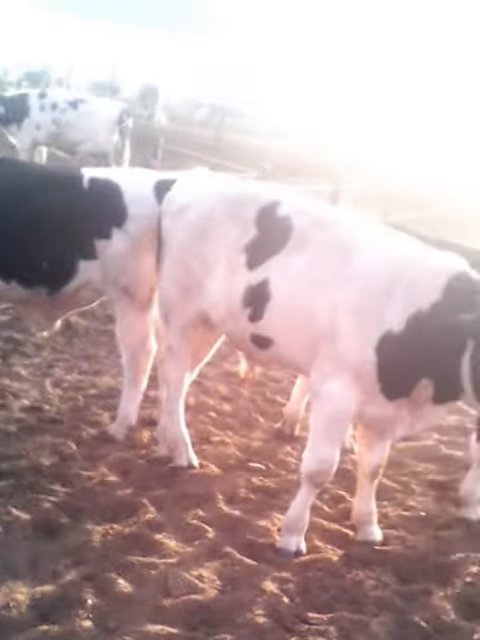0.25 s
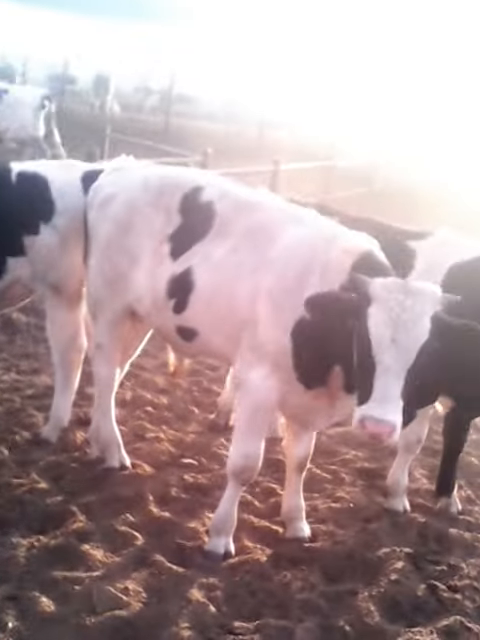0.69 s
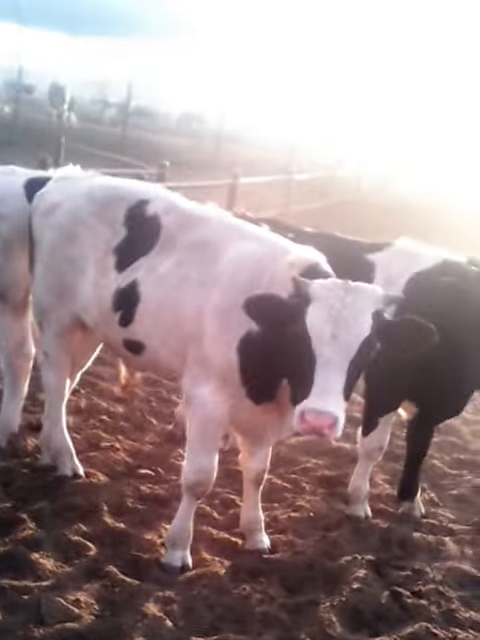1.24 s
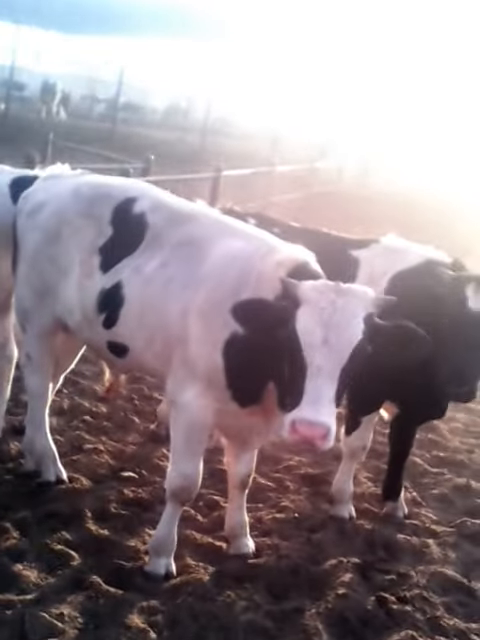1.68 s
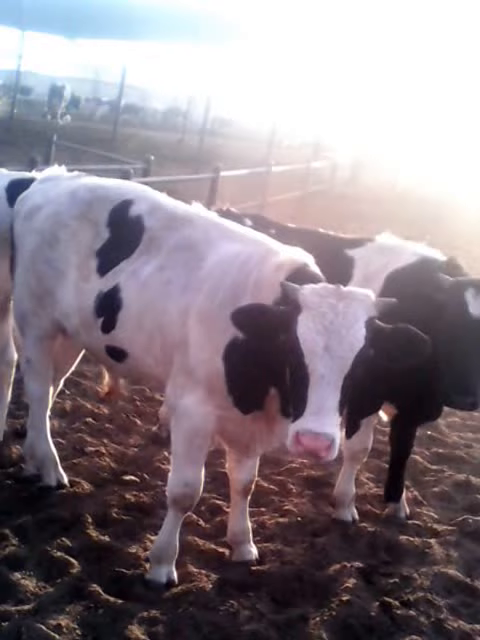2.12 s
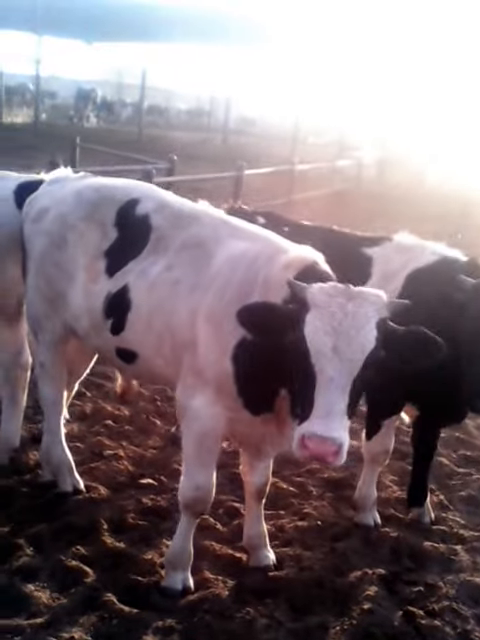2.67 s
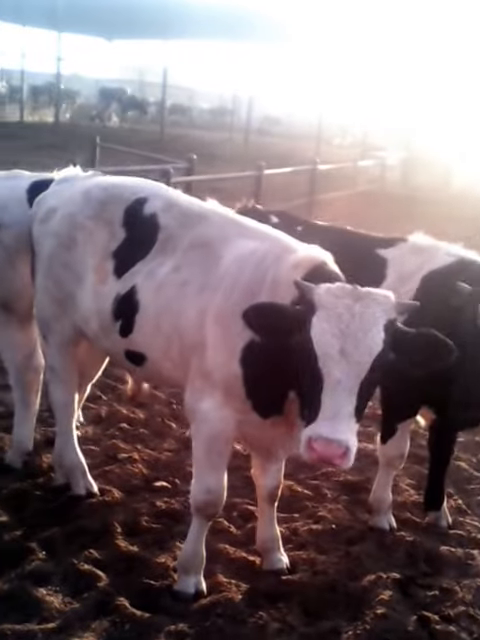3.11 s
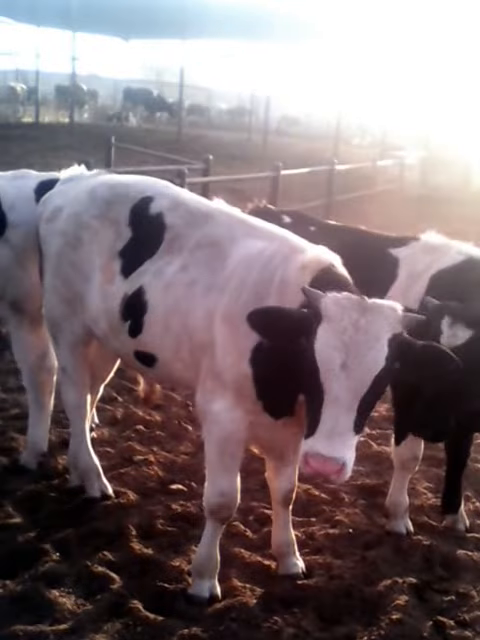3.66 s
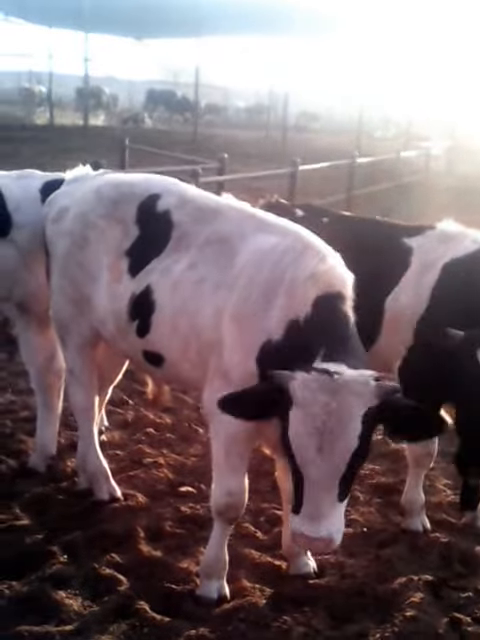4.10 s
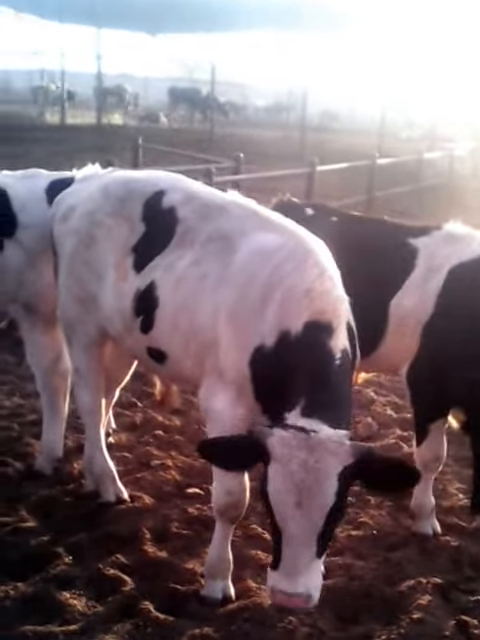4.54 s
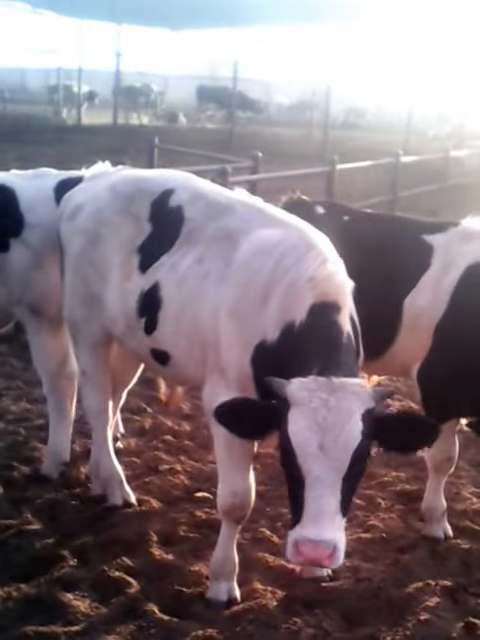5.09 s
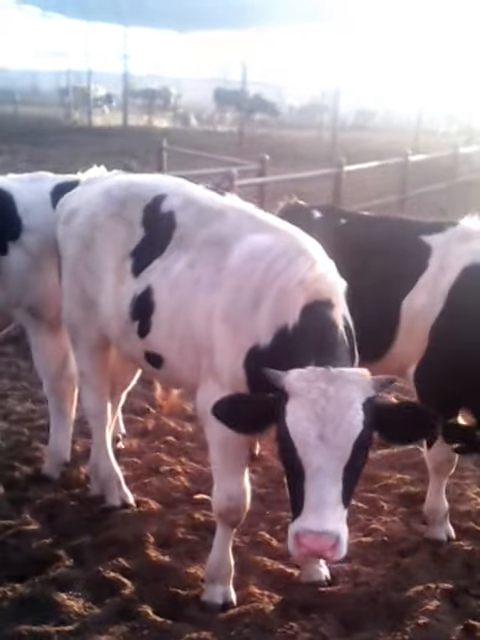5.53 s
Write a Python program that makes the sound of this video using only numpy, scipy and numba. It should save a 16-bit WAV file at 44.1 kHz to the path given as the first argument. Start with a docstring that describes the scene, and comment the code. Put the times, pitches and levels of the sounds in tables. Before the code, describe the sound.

A young bull moos five times in an open dirt pen, each call creaking into a clear rising tone, then cracking off abruptly.

```python
"""A young bull moos five times across a pen; the first call is already under way.
Calls 2-5 start as a low creak and lock into a clean rising tone; all five break into creak again.
Fold harmonics, chopped by slower flapping when slack, ring the throat; the fundamental hums through the nose.
Far sheds add a faint delayed echo, noise makes the farm's murmur and hiss, sines the phone's whine."""
import sys
import numpy as np
from scipy import signal
from scipy.fft import rfft, irfft, next_fast_len
from scipy.io import wavfile
from scipy.ndimage import uniform_filter1d
from numba import njit

SR = 44100
rng = np.random.default_rng(int(sys.argv[2]) if len(sys.argv) > 2 else 0)


def generate_wav(signal):
    """Clip the signal to [-1, 1] and save it as 16-bit WAV at the path in sys.argv[1]."""
    frames = np.transpose(np.atleast_2d(signal))
    scaled = np.clip(frames, -1, 1) * 32767
    pcm = np.round(scaled).astype(np.int16)
    wavfile.write(sys.argv[1], SR, pcm)


N = 256220
LEAD = 30000  # samples computed ahead of the output

# One curve per call: t/s, pitch f/Hz, main throat resonance level/dB
CALL_CURVES = [
    [(-.6, 194.3, -36.5), (0.0, 195, -38), (0.128, 191.1, -38.5), (0.16, 184.9, -42.5), (0.2, 163, -55.5),
     (0.25, 140, -65)],
    [(0.82, 121.6, -77), (0.918, 137.6, -68), (1.02, 146.7, -59.5), (1.08, 167.4, -61),
     (1.166, 174.5, -55.5), (1.316, 185.1, -46.5), (1.498, 193.1, -40), (1.604, 194.6, -38.5),
     (1.696, 191, -40), (1.74, 181.3, -46.5), (1.765, 168.6, -61), (1.81, 147.8, -69)],
    [(2.32, 121.6, -86), (2.398, 129.1, -70.5), (2.478, 153.4, -59.5), (2.53, 167.6, -61),
     (2.656, 181.4, -53), (2.834, 190.7, -42), (2.892, 193.8, -40.5), (3.062, 192.4, -42),
     (3.098, 180, -47), (3.126, 163.3, -57.5), (3.18, 147, -76)],
    [(3.61, 129.9, -87), (3.66, 143.4, -70), (3.738, 156.8, -60), (3.81, 167.2, -57), (3.96, 182.9, -45.5),
     (4.074, 189.9, -40), (4.218, 193.1, -38.5), (4.318, 192.1, -38.5), (4.354, 182.7, -44),
     (4.392, 161.4, -57), (4.44, 153.2, -75)],
    [(4.82, 131, -84), (4.892, 149.4, -61.5), (4.96, 167.3, -55), (5.07, 180.4, -47.5),
     (5.14, 185.2, -42.5), (5.338, 195, -35), (5.4, 200, -39), (5.484, 205.5, -41), (5.516, 175.3, -45),
     (5.545, 169, -59.5), (5.59, 150.4, -67)],
]
# Fold state, row per call: tone locks t/s, tone breaks t/s, break to shut mouth t/s,
# flap rate before and after f/Hz, slackness before and after [0-1]
CALL_STAGES = [(-.5, .135, .07, 102.2, 115.5, .8, 0.85), (1.101, 1.701, .065, 109.1, 113.1, 0.9, 0.73),
               (2.54, 3.065, .062, 103, 107, .78, 0.79), (3.819, 4.319, .072, 100, 110, .9, 0.75),
               (4.95, 5.47, 0.067, 104, 89.87, .66, 0.43)]
# Colour, row per call: hum at lock, hum at break, treble at lock, treble at break,
# lowest group at lock, lowest group at break, middle group, highest group; all level/dB
CALL_COLOURS = [(-51, -52.5, 2, 0.5, -3, -1.5, 0, 4.5), (-58, -55.5, -0.5, 0.5, -1.5, 1, 1, 0),
                (-58, -59, -4.5, -2.5, 1, 0, -1, -7), (-58.5, -55.5, -1, -0.5, 0.5, 0, -0.5, 2),
                (-58, -54, -2, -1.5, 0.5, 0, -0.5, 0.5)]
# Throat resonances by group, low to high: f shut/Hz, f open/Hz, width/Hz,
# level shut/dB, level open/dB (relative within the group)
THROAT_MODES = [
    [(340, 220, 71, -6, 1.5), (645, 641.7, 47.3, 7.5, 13.5)],
    [(989, 989.3, 50.8, -1.5, -4)],
    [(1410, 1100, 110, -9.5, -9), (1644, 1550, 73, 26, 33.5)],
    [(2070, 2210, 410, -1.5, -1), (2280, 2414, 194, 4.5, 2.5), (2940, 2850, 390, -11, -8)],
    [(3560, 3436, 300, 12.5, 22.5), (4500, 1400, 140, -2, -14.5)],
]
# Throat group: level open/dB, slope [dB per dB of main resonance], share of treble [1],
# narrow ring f/Hz, swell when an overtone lands on it level/dB
THROAT_GROUPS = [(-47.5, 0.6968, 0.059, 602, 0), (-43.5, 1, 0.073, 1000, 0), (-63.5, 0.45, 0.82, 1665, 6),
                 (-62, 0.53, .9, 2510, 2), (-72, .5, 0.85, 3500, 1.5)]
# Breath noise gain per throat group, ahead of AIR_GAIN: level/dB
BREATH_GAIN_DB = [-39, -38, -24, -20, -15]
# Hum re held level: at start, creaking, after break, mouth shutting, after it; level/dB
HUM_STAGE_DB = [-23.5, -8.5, -3.5, 1.5, -19.5]
# Sum tone re lowest group: before lock, after break, mouth shutting, after it; level/dB
SUM_STAGE_DB = [-1.5, -7.5, 7.5, -4]
# Treble change: at start, just after break, mouth shut; level/dB
TREBLE_STAGE_DB = [-5, 1, -5.5]
# Momentary cracks in the held tone: t/s, slackness [0-1]
TONE_CRACKS = [(1.49, .097), (4.06, .093)]
# Hard fold closure every third cycle: t/s, depth level/dB
RATTLE_DEPTH = [(5.355, 0), (5.378, 11), (5.47, 10), (5.5, 1.5)]
# Throat group lift under rattle: [dB per dB of rattle]
RATTLE_GROUP_LIFT = [.25, 0, 0.11, 0.23, 0.41]
# Far walls: delay t/s, level/dB ahead of the echo band-pass
WALL_ECHOES = [(.2, -33), (.325, -33.5)]
# Background noise density, relative: f/Hz, level/dB
FARM_SPECTRUM = [(20, -28.5), (35, -6.5), (55, -2.5), (70, -0.5), (190, -0.5), (450, -3.5), (600, -5.5),
                 (1000, -5), (1250, -8.5), (2500, -13), (6300, -13.5), (7400, -22), (8600, -37),
                 (10000, -31.5), (12400, -35.5), (12900, -25.5), (13400, -35.5), (15400, -31.5)]
# Electrical whine: f/Hz, RMS level/dB
WHINE_LINES = [(6449, -88), (12898, -108)]

SHUT_DB, OPEN_DB = -62, -44  # main resonance level, mouth shut and fully open
SLACK_FLOOR = .08  # below this slackness flapping stops
TIGHTEN_S, SLACKEN_S = .055, .03  # slackness leaving and returning
FRAY, FRAY_S = 0.097, 0.098  # slackness creeping in before the break; lead time
CRACK_S = .018
HUM_DROP_S = .025  # shut mouth to last hum level
UNEVEN_BEFORE, UNEVEN_AFTER = .14, .25  # log spread of flap rate
FLAP_S, SLAP_DB = .003, 17  # gate decay; air slap gain
SUM_WIDTH_HZ = 84
RATTLE_SHUT = .03  # share of mouth opening lost per dB of rattle
RATTLE_RUSH = .03  # rad of phase crowding per dB of rattle
AIR_GAIN, AIR_HZ = 20, 3980  # breath factor; voice low-pass corner
ECHO_DB, ECHO_START_S, ECHO_T60_S = -22.5, 0.14, 1.1  # scatter level is ahead of the band-pass
ECHO_HZ, ECHO_WIDTH_HZ = 590, 220
FARM_DB = -67  # RMS
TOP_HZ = 15450

START_S, END_S = np.transpose([(call[0][0], call[-1][0]) for call in CALL_CURVES])
LOCK_S, SNAP_S, CLOSING_S, RATE_BEFORE_HZ, RATE_AFTER_HZ, LOOSE, SLACK = np.transpose(CALL_STAGES)
SHUT_S = SNAP_S + CLOSING_S
(HUM_LOCK_DB, HUM_BREAK_DB, TREBLE_LOCK_DB, TREBLE_BREAK_DB,
 LOW_LOCK_DB, LOW_BREAK_DB, MIDDLE_DB, TOP_DB) = np.transpose(CALL_COLOURS)


def bull():
    """Fold pulses and breath ring the throat; flapping adds a sum tone, the nose a hum."""
    t = np.arange(-LEAD, N) / SR
    s, *columns = np.concatenate(CALL_CURVES).T
    hz, level_db = (np.interp(t, s, c) for c in columns)
    rattle_db = np.maximum(np.interp(t, *np.transpose(RATTLE_DEPTH), right=0), 0)
    slackness = fold_slackness(t)
    group_db = group_levels(t, hz, level_db, slackness, rattle_db)
    share = np.clip((slackness - SLACK_FLOOR) / (1 - SLACK_FLOOR), 0, 1)
    opening = np.clip((level_db - SHUT_DB) / (OPEN_DB - SHUT_DB), 0, 1)
    mouth = opening * np.clip(1 - RATTLE_SHUT * rattle_db, 0, 1)

    jitter = 1 + 0.002866 * walk(60, len(t))
    phase = 2 * np.pi * np.cumsum(hz * jitter) / SR
    folds = fold_pulses(t, phase, rattle_db)
    rate_hz, flaps, gate = flapping(t)
    slap = undb(SLAP_DB) * even(flaps)
    chopped = np.sqrt(1 - share) * folds + np.sqrt(share) * (gate * folds + slap)
    # air rushes through while the folds stand open
    air = AIR_GAIN * (1 + np.cos(phase)) * rng.standard_normal(len(t))

    # signs keep alternating from one group into the next
    signs = np.cumprod([1] + [(-1) ** len(modes) for modes in THROAT_MODES])
    voice = sum(sign * undb(db) * throat(chopped + undb(air_db) * air, modes, mouth)
                for sign, db, modes, air_db in zip(signs, group_db, THROAT_MODES, BREATH_GAIN_DB))
    sum_gain = np.sqrt(share) * undb(group_db[0] + sum_level(t))
    voice = voice + sum_gain * sum_tone(gate, phase, hz + rate_hz)
    # soft folds and distance take the treble
    voice = -signal.sosfilt(signal.butter(6, AIR_HZ, fs=SR, output="sos"), voice)
    hum = undb(hum_level(t)) * np.sqrt(2) * np.sin(phase)
    calling = sum((t > a) & (t < b) for a, b in zip(START_S, END_S))
    return uniform_filter1d(1. * calling, size=900) * (voice + hum)


def fold_slackness(t):
    """Folds tighten at the lock, fray before the break, then slacken; brief cracks interrupt."""
    base = staged(t, [START_S, LOCK_S - TIGHTEN_S, LOCK_S, SNAP_S - FRAY_S, SNAP_S, SNAP_S + SLACKEN_S, END_S],
                  [LOOSE, LOOSE, 0, 0, FRAY, SLACK, SLACK])
    return base + sum(peak * np.exp(-((t - s) / CRACK_S) ** 2) for s, peak in TONE_CRACKS)


def fold_pulses(t, phase, rattle_db):
    """Harmonics 2-25; under rattle strong, missed and middling closures take turns."""
    third = phase / 3 + np.pi / 6
    crowded = phase + RATTLE_RUSH * rattle_db * np.sin(third)
    folds = sum(np.cos(k * crowded) for k in range(2, 26))
    # unlike rattle_db, this depth holds its last value
    return folds * undb(np.interp(t, *np.transpose(RATTLE_DEPTH)) * np.cos(third))


def flapping(t):
    """Irregular flaps; each opens a decaying gate that lets the folds sound."""
    moments = [START_S, LOCK_S, SNAP_S, END_S]
    rate_hz = staged(t, moments, [RATE_BEFORE_HZ, RATE_BEFORE_HZ, RATE_AFTER_HZ, RATE_AFTER_HZ])
    uneven = staged(t, moments, [UNEVEN_BEFORE, UNEVEN_BEFORE, UNEVEN_AFTER, UNEVEN_AFTER])
    flaps = flap(rate_hz, np.clip(uneven, 0, .5), rng.standard_normal((2000, 2)), 0.63)
    gate = even(signal.lfilter([1], [1, -np.exp(-1 / (FLAP_S * SR))], flaps))
    return rate_hz, flaps, gate


@njit
def flap(rate_hz, uneven, chance, spread):
    """A pulse at each phase wrap, split over two samples; period and size scatter with unevenness."""
    pulses, p, k = np.zeros(len(rate_hz) + 1), 0., 0
    for i in range(len(rate_hz)):
        step = rate_hz[i] * np.exp(uneven[i] * chance[k, 0]) / SR
        p += step
        if p >= 1:
            p, k = p - 1, k + 1
            size = np.exp(spread * uneven[i] * chance[k, 1])
            pulses[i] += size * p / step
            pulses[i + 1] += size * (1 - p / step)
    return pulses[:-1]


def throat(source, modes, mouth):
    """Parallel resonances of alternating sign shift with the mouth and waver as the head turns."""
    out = 0
    for k, (shut_hz, open_hz, width_hz, shut_db, open_db) in enumerate(modes):
        db = shut_db + (open_db - shut_db) * mouth + 1.5 * walk(14, len(source))
        centre_hz = shut_hz + (open_hz - shut_hz) * mouth
        out = out + (-1) ** k * undb(db) * svf(source, centre_hz, 1. * width_hz)
    return even(out)


def group_levels(t, hz, level_db, slackness, rattle_db):
    """Throat group levels/dB follow the main resonance, treble, overtone hits, rattle and call colour."""
    first, broken, last = TREBLE_STAGE_DB
    treble_db = staged(t, [START_S, LOCK_S, SNAP_S, SNAP_S + SLACKEN_S, SHUT_S, END_S],
                       [TREBLE_LOCK_DB + first, TREBLE_LOCK_DB]
                       + [TREBLE_BREAK_DB + db for db in (0, broken, last, last)])
    steady = np.clip(1 - slackness, 0, 1)
    group_db = []
    for (db, slope, part, ring_hz, swell_db), lift in zip(THROAT_GROUPS, RATTLE_GROUP_LIFT):
        swell = swell_db * steady * np.cos(2 * np.pi * ring_hz / hz)
        group_db.append(db + slope * (level_db - OPEN_DB) + part * treble_db + swell + lift * rattle_db)
    group_db[0] += staged(t, [START_S, LOCK_S, SNAP_S, END_S],
                          [LOW_LOCK_DB, LOW_LOCK_DB, LOW_BREAK_DB, LOW_BREAK_DB])
    group_db[2] += staged(t, [START_S, END_S], [MIDDLE_DB, MIDDLE_DB])
    group_db[-1] += staged(t, [START_S, END_S], [TOP_DB, TOP_DB])
    return group_db


def sum_tone(gate, phase, sum_hz):
    """The chopped fundamental leaves a tone at pitch plus flap rate, taken by two band-passes."""
    once = svf(gate * np.sin(phase), sum_hz, 1. * SUM_WIDTH_HZ)
    return even(svf(once, sum_hz, 1. * SUM_WIDTH_HZ))


def sum_level(t):
    """Sum tone level/dB re the lowest throat group."""
    before, broken, shutting, last = SUM_STAGE_DB
    return staged(t, [START_S, LOCK_S, SNAP_S + SLACKEN_S, SHUT_S, SHUT_S + HUM_DROP_S, END_S],
                  [before, before, broken, shutting, last, last])


def hum_level(t):
    """Nasal hum RMS level/dB through the stages of each call."""
    first, creak, broken, shutting, last = HUM_STAGE_DB
    return staged(t, [START_S, LOCK_S - TIGHTEN_S, LOCK_S, SNAP_S, SNAP_S + SLACKEN_S,
                      SHUT_S, SHUT_S + HUM_DROP_S, END_S],
                  [HUM_LOCK_DB + db for db in (first, creak, 0)]
                  + [HUM_BREAK_DB + db for db in (0, broken, shutting, last, last)])


def staged(t, moments, values):
    """Join one value at each moment of every call into a curve."""
    values = np.transpose([np.broadcast_to(v, len(CALL_CURVES)) for v in values])
    moments = np.maximum.accumulate(np.transpose(moments).ravel())
    return np.interp(t, moments, values.ravel())


@njit
def svf(x, hz, width_hz):
    """State-variable band-pass with a moving centre, gain 1 there."""
    y, b, l = np.empty(len(x)), 0., 0.
    for i in range(len(x)):
        g, k = np.tan(np.pi * hz[i] / SR), width_hz / hz[i]
        v = (b + g * (x[i] - l)) / (1 + g * (g + k))
        b, l, y[i] = 2 * v - b, l + 2 * g * v, k * v
    return y


def undb(db):
    """Decibels to gain."""
    return 10 ** (np.asarray(db) / 20)


def even(x, size=2048):
    """Divide out the running RMS."""
    power = uniform_filter1d(uniform_filter1d(x ** 2, size), size)
    return x / np.sqrt(power + 1e-12)


def walk(rate_hz, size):
    """Random levels held 1 / rate_hz, smoothed twice; spread near 1."""
    k = int(SR / rate_hz)
    held = np.repeat(rng.standard_normal(size // k + 1), k)
    return 1.466 * uniform_filter1d(uniform_filter1d(held, k), k)[:size]


def sheds(x):
    """Two far walls and late, fading scatter, band-passed to the middle pitches."""
    t = np.arange(SR) / SR
    tail = rng.standard_normal(SR) * (t > ECHO_START_S) * undb(-60 * t / ECHO_T60_S)
    tail = undb(ECHO_DB) * tail / np.sqrt(np.sum(tail ** 2))
    for s, db in WALL_ECHOES:
        tail[int(s * SR)] += undb(db)
    tail = svf(tail, np.full(SR, 1. * ECHO_HZ), 1. * ECHO_WIDTH_HZ)
    return signal.fftconvolve(x, tail)[:len(x)]


def farm():
    """Shaped noise split into a slowly swelling low murmur and a steady hiss."""
    size = next_fast_len(N)
    hz = np.arange(size // 2 + 1) * SR / size + 1
    table_hz, table_db = np.transpose(FARM_SPECTRUM)
    colour = undb(np.interp(np.log(hz), np.log(table_hz), table_db))
    low = 1 / (1 + (hz / 1200) ** 2)  # power share of the murmur
    murmur, hiss = (irfft(rfft(rng.standard_normal(size)) * colour * np.sqrt(w), size)[:N]
                    for w in (low, 1 - low))
    out = murmur * undb(1.5 * walk(4.15, N)) + hiss
    return out * undb(FARM_DB) / np.std(out)


def scene():
    """The calls, their echo and the background."""
    call = bull()
    return ((call + sheds(call))[LEAD:] + farm())[None]


def record(dry):
    """The phone adds a thin electrical whine and cuts the top."""
    t = np.arange(N) / SR
    whine = sum(undb(db) * np.sqrt(2) * np.sin(2 * np.pi * hz * t) for hz, db in WHINE_LINES)
    return signal.sosfilt(signal.ellip(8, .2, 70, TOP_HZ, fs=SR, output="sos"), dry + whine)


dry = scene()
out = record(dry)
generate_wav(out)
```